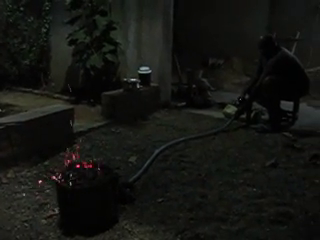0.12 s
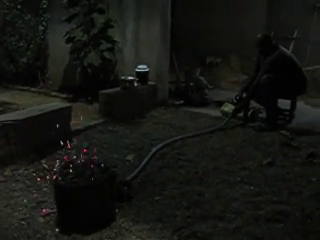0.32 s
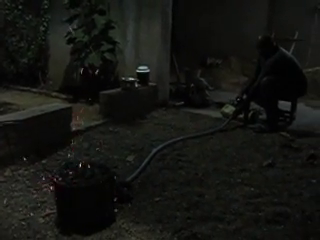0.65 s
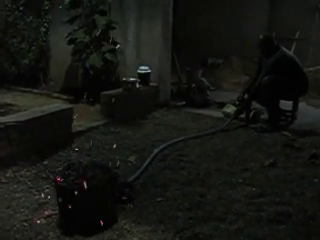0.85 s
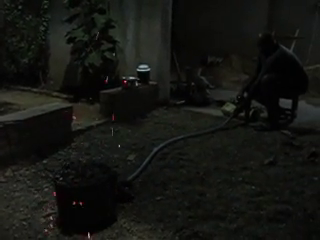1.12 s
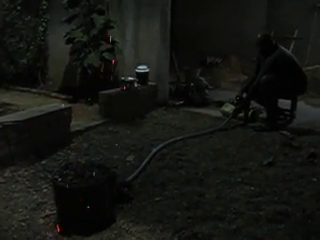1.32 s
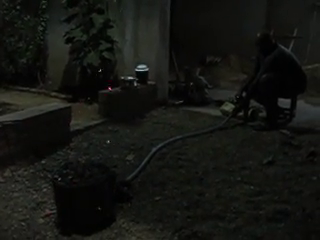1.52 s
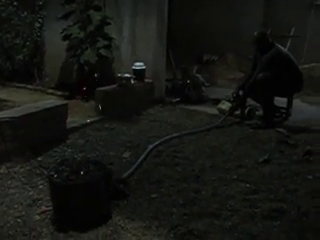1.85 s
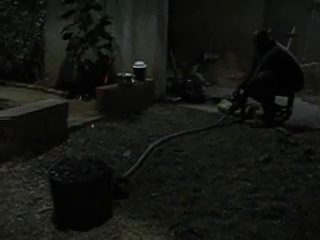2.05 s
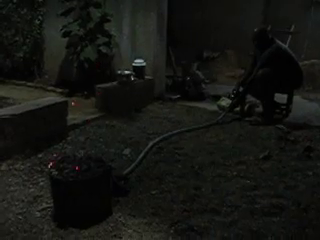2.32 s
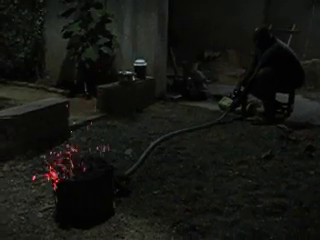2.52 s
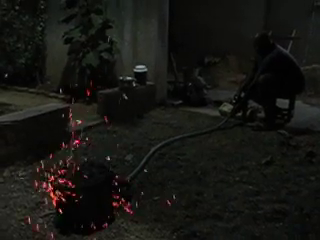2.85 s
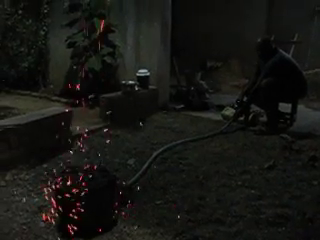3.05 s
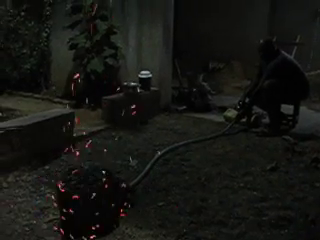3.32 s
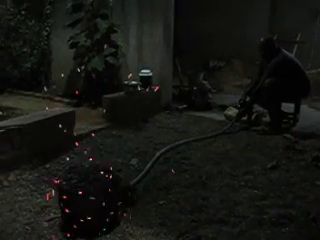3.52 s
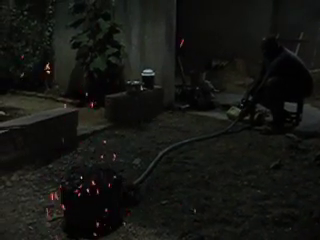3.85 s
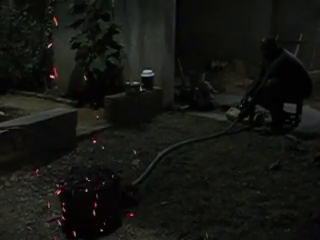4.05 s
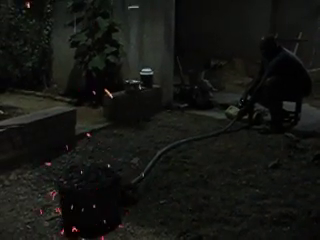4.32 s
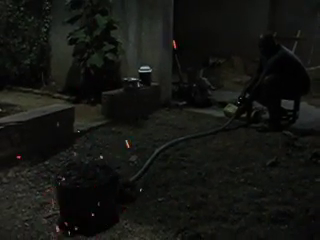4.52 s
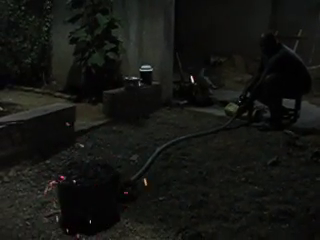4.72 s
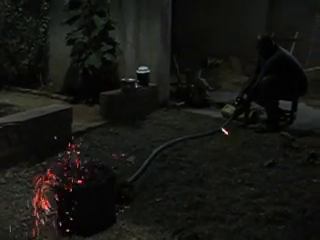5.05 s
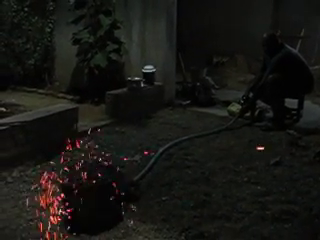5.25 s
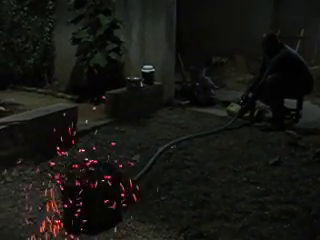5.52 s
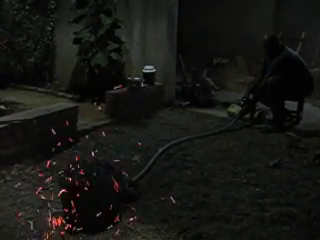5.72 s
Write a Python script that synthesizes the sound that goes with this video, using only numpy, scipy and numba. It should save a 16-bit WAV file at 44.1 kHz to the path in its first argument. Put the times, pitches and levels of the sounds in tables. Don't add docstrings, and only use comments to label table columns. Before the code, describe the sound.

A hand blower close to the microphone is already coasting down, its whine falling while air roars through a pot of charcoal. Coals tick, snap and pop. The motor revs briefly at two seconds, sinks, then revs again at four and a half. Far off, a vehicle faintly drones between the bursts. A very loud pop comes just before a buzzing scooter horn from the street ends it. Small camera microphone, dull narrow band, low night rumble beneath.

```python
import sys
import numpy as np
from scipy import signal
from scipy.fft import rfft, irfft
from scipy.io import wavfile
from scipy.ndimage import uniform_filter1d
from numba import njit

SR = 44100
rng = np.random.default_rng(int(sys.argv[2]) if len(sys.argv) > 2 else 0)


def store_wav(level_fs):
    pcm = np.round(np.clip(np.atleast_2d(level_fs), -1, 1) * 32767)
    wavfile.write(sys.argv[1], SR, pcm.T.astype(np.int16))


def nominal_scale(level):
    x = np.asarray(level, float) / 20
    return 10 ** x


N = 259298
T = np.arange(N) / SR

# (pressed [s], released [s])
TRIGGER = [
    (2.0605, 2.39),
    (4.5288, 4.8157),
]


def colour(x, points):
    hz, db = np.transpose(points)
    f = np.maximum(np.fft.rfftfreq(N, 1 / SR), 1)
    return irfft(rfft(x) * nominal_scale(np.interp(np.log(f), np.log(hz), db)), N)


def unit(x):
    return x / np.sqrt(np.mean(x ** 2))


def walk(rate):
    k = int(SR / rate)
    held = np.repeat(rng.standard_normal(N // k + 1), k)
    return 1.3 * uniform_filter1d(uniform_filter1d(held, k), k)[:N]


def split(x, hz):
    low = signal.sosfiltfilt(signal.butter(2, hz, fs=SR, output="sos"), x)
    return low, x - low


def resonate(x, modes):
    f = np.fft.rfftfreq(N, 1 / SR)
    power = sum(nominal_scale(db) ** 2 / (1 + (2 * (f - hz) / width) ** 4) for hz, width, db in modes)
    return irfft(rfft(x) * np.sqrt(power), N)


def swell_shape(s, half_length):
    return np.exp(-((T - s) / half_length) ** 4)


def yard():
    # (frequency [Hz], density [dB per Hz])
    night_spectrum = [(15, -30), (25, -1.5), (108, -3), (210, -9), (247, -4), (427, -20.5), (792, -24.5),
                      (1250, -30.5), (1890, -25.5), (4950, -34), (5940, -40), (7720, -68), (13100, -120)]
    low, high = split(colour(rng.standard_normal(N), night_spectrum), 180)
    rumble = unit(low * nominal_scale(0.65 * walk(6)) + high) * nominal_scale(-23)
    insect_db = -58 + 3 * walk(2.5)
    return rumble + np.sqrt(2) * nominal_scale(insect_db) * np.sin(2 * np.pi * 4829 * T)


def drone():
    # (time [s], half length [s], pitch [Hz], level [dB])
    notes_heard = [
        (3.86, 0.087, 639, -35.5),
        (4.06, .045, 615, -39.5),
    ]
    out = 0
    for s, half_length, hz, db in notes_heard:
        level = nominal_scale(db + 1.5 * walk(30)) * swell_shape(s, half_length)
        out = out + level * np.sin(2 * np.pi * hz * T)
    return np.sqrt(2) * out


def horn():
    # (time [s], pitch [Hz])
    glide = [
        (5.65, 407),
        (5.76, 400.5),
        (5.84, 407),
        (5.88, 406),
    ]
    partials = (7, 8, 6, 9, 4, 5, 10, 11, 12, 14)
    # (time [s], half length [s], 7th partial level [dB], 8th over 7th [dB])
    swells = [(5.689, 0.015, -14, -9), (5.723, 0.017, -17, -1.5), (5.748, 0.0093, -15.5, -17),
              (5.772, 0.01, -14.5, -13), (5.799, .017, -24, -5), (5.834, 0.011, -23.5, -10),
              (5.858, 0.0081, -21.5, -17), (5.876, .009, -32, -5.5)]
    weak_levels = [-32.5, -33, -47, -48, -48, -54, -56, -58]
    glide_s, glide_hz = np.transpose(glide)
    pitch = np.interp(T, glide_s, glide_hz)
    turns = np.cumsum(pitch * (1 + .002 * walk(40))) / SR
    seventh = sum(nominal_scale(db) * swell_shape(s, half) for s, half, db, _ in swells)
    eighth = sum(nominal_scale(db + rel_db) * swell_shape(s, half) for s, half, db, rel_db in swells)
    onset = np.clip((T - 5.665) / 0.01, 0, 1)
    weak = [nominal_scale(db - 8.0 * np.abs(walk(45))) * onset for db in weak_levels]
    out = 0
    for k, level in zip(partials, [seventh, eighth] + weak):
        out = out + level * np.sin(2 * np.pi * (k * turns + rng.random()))
    return nominal_scale(6.5) * np.sqrt(2) * out


def coals():
    # (time [s], peak level [dB], high mode over low mode [dB])
    pops = [(.1111, -19.5, -9), (0.1734, -12, -5.5), (0.2023, -20, -6), (0.4103, -17.5, 9),
            (1.1863, -12.5, -7), (1.2074, -13.5, -6), (1.241, -13, -1), (1.5702, -4.8, -2),
            (1.6763, -18, -0.5), (2.4637, -16.5, -4.5), (2.4875, -5.5, -11), (2.5173, -11.5, -9),
            (2.5395, -16, 0), (2.5444, -14, 2), (2.6386, -17, -5), (2.811, -17.5, -1), (3.2464, -20, -2),
            (3.5637, -18, -9), (3.5835, -21, 0.5), (4.3828, -20, 7), (4.4697, -23, 5), (4.7739, -19, 0),
            (4.8802, -16, -5), (4.989, -16.5, 1), (5.193, -14.5, -8), (5.3646, -16, 5), (5.5056, -12.5, -5),
            (5.5752, -3.5, -4.5), (5.6779, -10, -19), (5.8114, -20, 0)]
    # (time [s], length [s], peak level [dB])
    sprays = [
        (2.505, .045, -21),
        (5.603, .017, -14),
    ]
    pop_t60, tick_t60 = .0065, .005
    events = [(*pop, pop_t60) for pop in pops]
    for a, b, c in rng.random((150, 3)):
        events.append((5.87 * a, -36 - 2.6 * np.log(1 - b * .98), -2 + 12 * c, tick_t60))
    for s, length, db in sprays:
        for a, b, c in rng.random((16, 3)):
            events.append((s + length * a ** 1.5, db - 6 * b - 5 * a, -6 + 10 * c, tick_t60))
    t = np.arange(1024) / SR
    out = np.zeros(N + 2 * len(t))
    for s, db, high_db, t60 in events:
        low_hz, high_hz = np.array([3200, 4850]) * (1 + .04 * rng.standard_normal(2))
        low = np.sin(2 * np.pi * low_hz * t)
        high = np.sin(2 * np.pi * high_hz * t)
        ring = (low - nominal_scale(high_db - 1.5) * high) * nominal_scale(-60 * t / t60)
        ring = ring / np.abs(ring).max()
        grit = 0.25 * rng.standard_normal(len(t)) * nominal_scale(-60 * t / (4.6 * t60))
        start = int((s + .0011) * SR)
        out[start:start + len(t)] += nominal_scale(1.2 * db + 7) * (ring + grit)
    return out[:N]


def shaft():
    start_hz, step_s = 163.76, .002
    stall_pull, knee_hz, knee_power = 893.95, 143.26, 2.886
    rub, fan_drag, slip_hz = 26.38, .00287, 18.59
    t = np.arange(0, T[-1] + step_s, step_s)
    held = 0
    for on, off in TRIGGER:
        held = held + np.clip((t - on) / step_s, 0, 1) * np.clip((off - t) / step_s, 0, 1)
    hz = [start_hz]
    for press in held[:-1]:
        pull = press * stall_pull / (1 + (hz[-1] / knee_hz) ** knee_power)
        drag = rub + fan_drag * (hz[-1] - slip_hz) ** 2
        hz.append(hz[-1] + step_s * (pull - drag))
    return np.interp(T, t, hz)


def motor_current():
    rise_s = .02
    keep = np.exp(-1 / (rise_s * SR))
    held = sum(1. * ((T > on) & (T < off)) for on, off in TRIGGER)
    return signal.lfilter([1 - keep], [1, -keep], held)


def air():
    # (frequency [Hz], density [dB per Hz])
    air_spectrum = [(110, -39), (190, -3), (338, 1), (374, -5.5), (544, -13), (576, -14.5), (954, -4.5),
                    (1310, -20), (1700, -17.5), (1850, -23.5), (2470, -18.5), (3020, -14.5), (5140, -31),
                    (5940, -28.5), (7720, -72), (13100, -120)]
    hose_lag_s = 0.047
    intake_db = 20 * np.log10(shaft() / 152.5)
    hose_db = np.interp(T - hose_lag_s, T, intake_db)
    low, hiss = split(colour(rng.standard_normal(N), air_spectrum), 1400)
    roar, rush = split(low, 680)
    roar_db = -22.5 + 0.72 * hose_db + 0.87 * walk(13) + .8 * walk(4)
    rush_db = -30.5 + 1.72 * hose_db + 0.63 * walk(6.3)
    hiss_db = -31 + 1.9 * intake_db + 4 * motor_current() + 0.6 * walk(12)
    return unit(roar) * nominal_scale(roar_db) + unit(rush) * nominal_scale(rush_db) + unit(hiss) * nominal_scale(hiss_db)


def whine():
    fan_orders = (10, 20)
    brush_orders = (22, 23, 24, 25, 27, 28, 31, 35, 36, 47, 48, 49)
    core_orders = (11, 12, 13, 23, 24, 25)
    # (coasting [dB], driven [dB])
    fan_levels = [(-34, -33), (-48, -46)]
    brush_levels = [(-48, -48), (-45, -44), (-34.5, -35), (-43, -41), (-48, -47), (-49, -47), (-50, -48),
                    (-51, -49), (-49, -47), (-48, -47), (-43, -43), (-48, -47)]
    core_levels = [(-46, -33), (-45, -28), (-56, -35), (-70, -43), (-70, -34), (-70, -41)]
    # (frequency [Hz], width [Hz], level [dB])
    fan_case = [(760, 80, -2), (880, 170, -1), (1280, 130, -5), (1670, 170, 4), (1900, 260, 0),
                (2250, 250, 1), (3000, 1200, -3)]
    motor_case = [(1790, 120, -9), (1970, 150, 3), (2280, 110, 2), (2420, 100, 1), (2620, 170, 4),
                  (2820, 120, -1), (2990, 100, -1), (3300, 220, 1), (3720, 250, -6), (4170, 250, -8),
                  (4470, 220, -3), (4780, 200, -7), (5350, 500, -11)]
    iron_core = [(1860, 240, 2), (2060, 120, 2), (2270, 220, 2), (2950, 900, -4), (3700, 700, -3),
                 (4400, 400, 0)]
    turns = np.cumsum(shaft() * (1 + .0015 * walk(60))) / SR
    current = motor_current()
    mains_buzz = 1 + .35 * current * np.sin(2 * np.pi * 100 * T)
    parts = ((fan_orders, fan_levels, fan_case),
             (brush_orders, brush_levels, motor_case),
             (core_orders, core_levels, iron_core))
    out = 0
    for orders, levels, body in parts:
        lines = 0
        for k, (coast_db, driven_db) in zip(orders, levels):
            flutter_db = (2.4 + .3 * current) * walk(45)
            db = coast_db + (driven_db - coast_db) * current + flutter_db
            sparking = (.025 + .12 * current) * walk(200)
            lines = lines + nominal_scale(db) * np.sin(2 * np.pi * (k * turns + sparking + rng.random()))
        out = out + resonate(np.sqrt(2) * mains_buzz * lines, body)
    return nominal_scale(-0.3) * out


def scene():
    return (yard() + drone() + horn() + coals() + air() + whine())[None]


@njit
def gain_control(x, top, ratio, attack, release):
    y, e = np.empty(len(x)), top
    for i in range(len(x)):
        a = abs(x[i])
        e += (a - e) * (attack if a > e else release)
        y[i] = x[i] * min(1., top / e) ** (1 - 1 / ratio)
    return y


def band_limit(x):
    return signal.sosfilt(signal.butter(12, 16000, fs=SR, output="sos"), x)


def record(dry):
    attack_s, release_s = .0007, .08
    x = gain_control(dry[0], .27, 8., 1 / (attack_s * SR), 1 / (release_s * SR))
    x = signal.sosfiltfilt(signal.cheby1(7, .3, 5500, fs=SR, output="sos"), x)
    offset, ceiling = -.032, .715
    x = np.clip(x + offset, -ceiling, ceiling)
    return band_limit(x[None])


dry = scene()
out = record(dry)
store_wav(out)
```